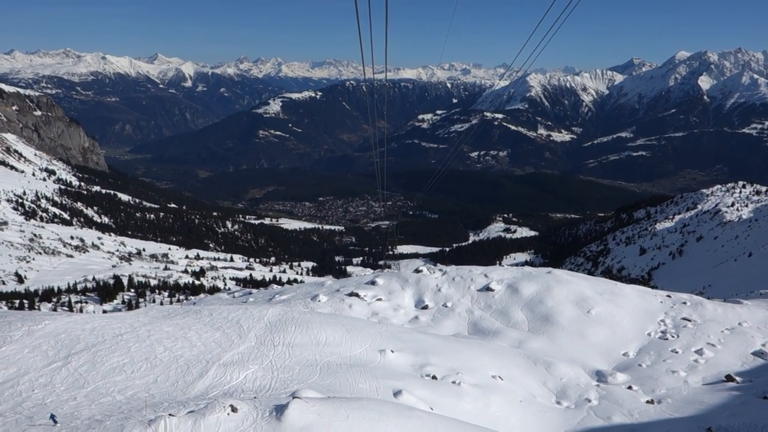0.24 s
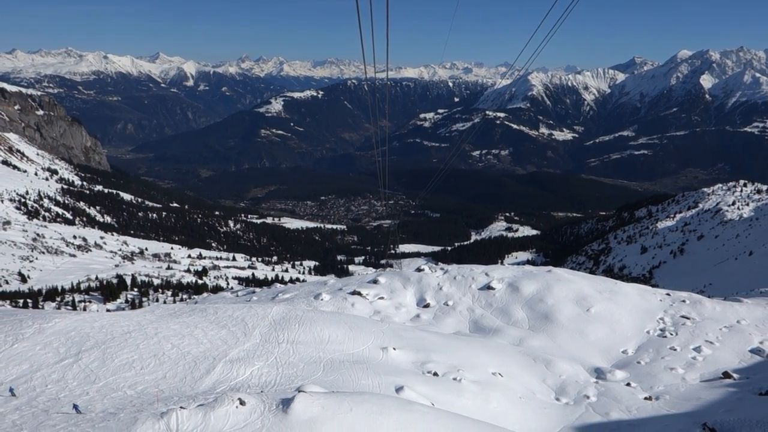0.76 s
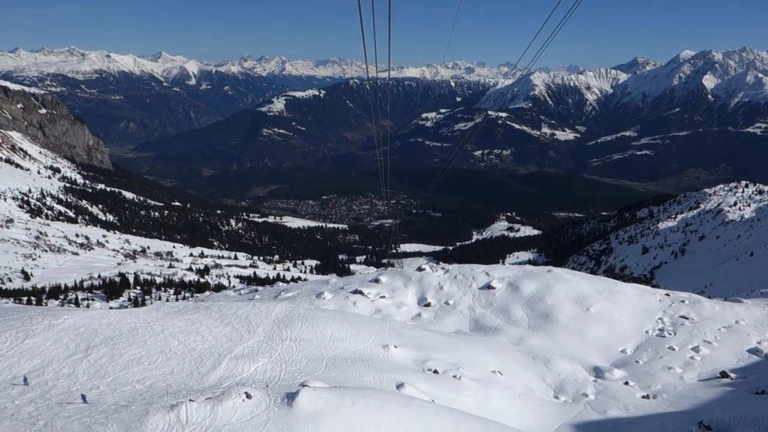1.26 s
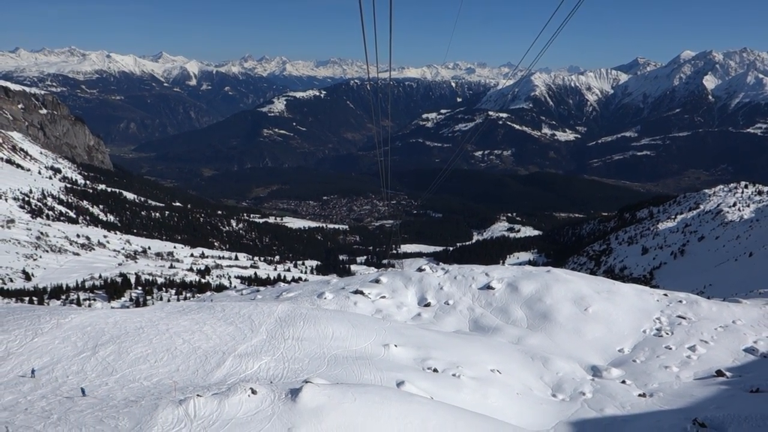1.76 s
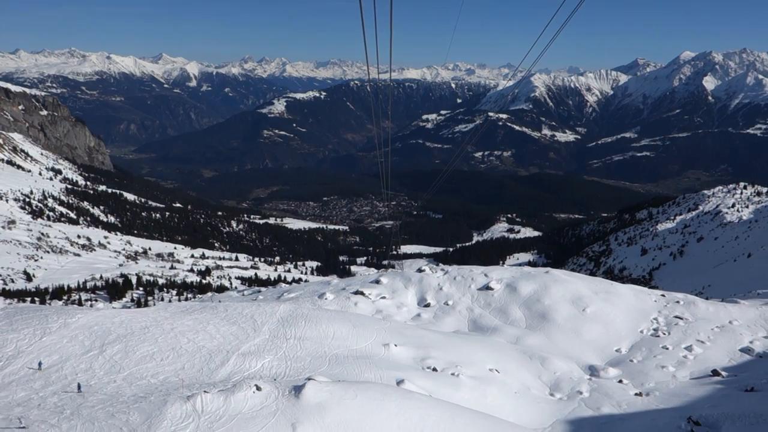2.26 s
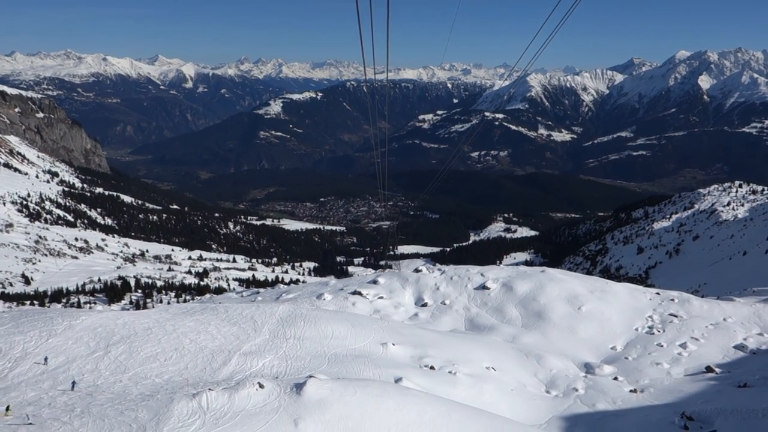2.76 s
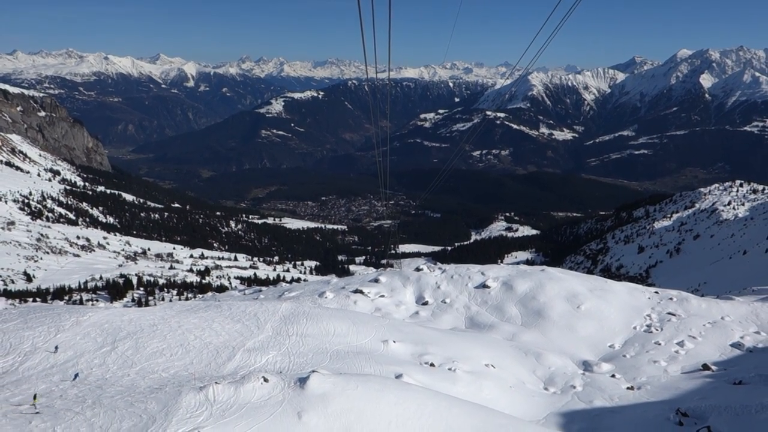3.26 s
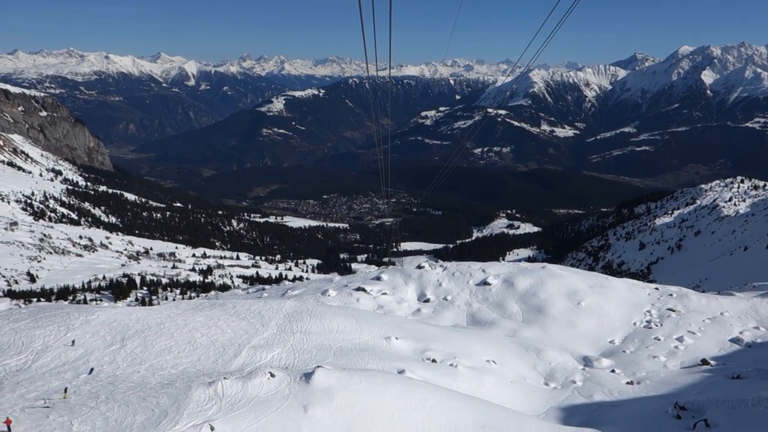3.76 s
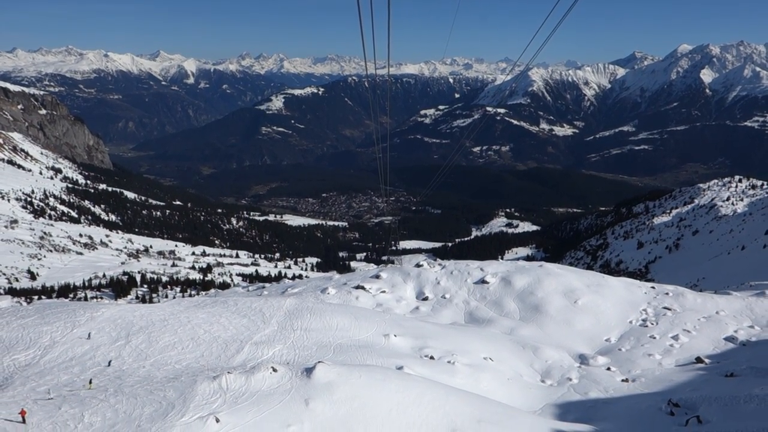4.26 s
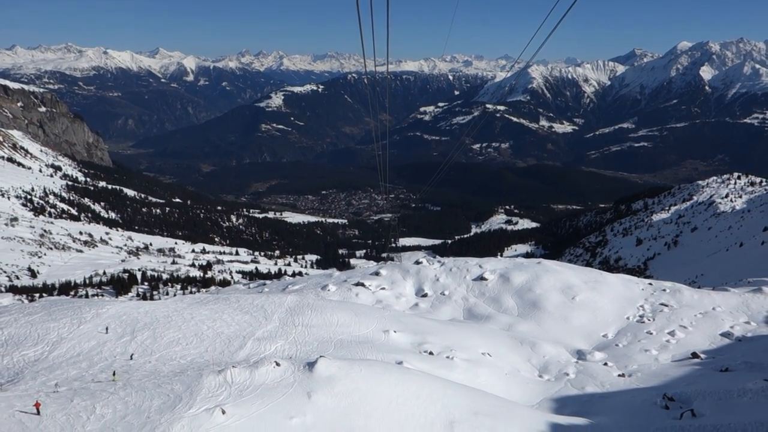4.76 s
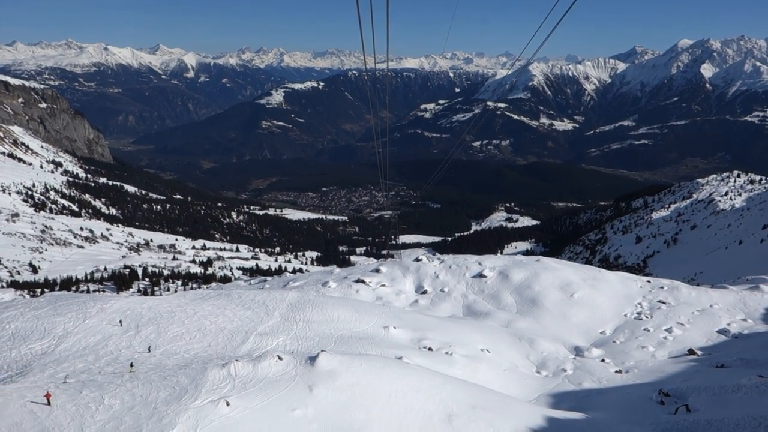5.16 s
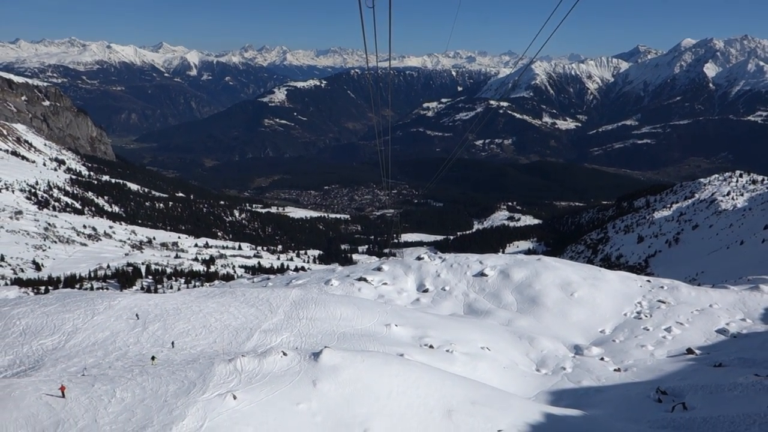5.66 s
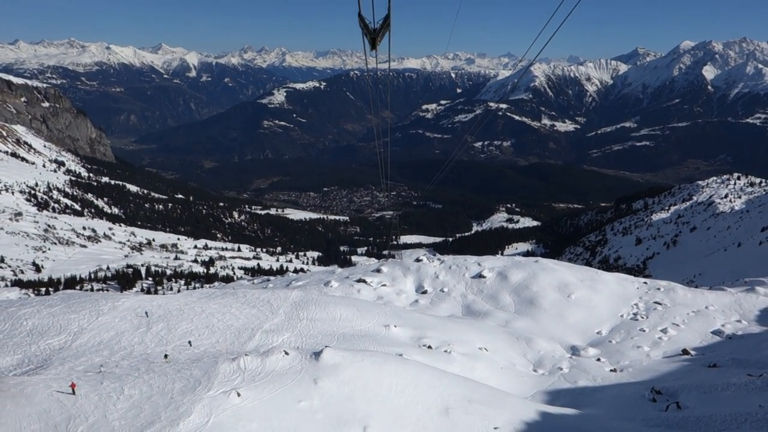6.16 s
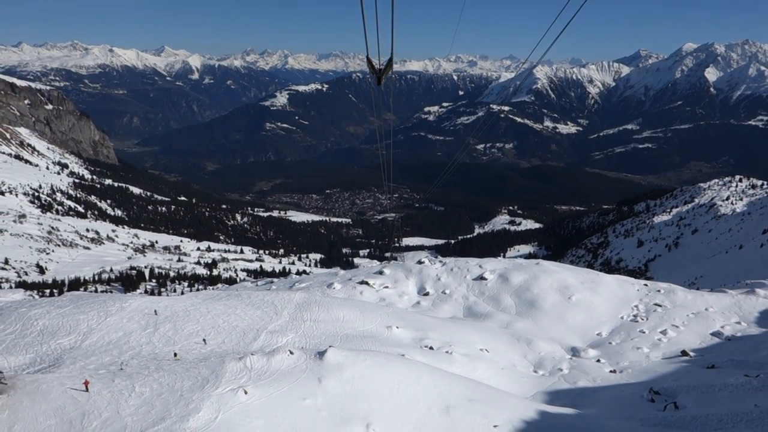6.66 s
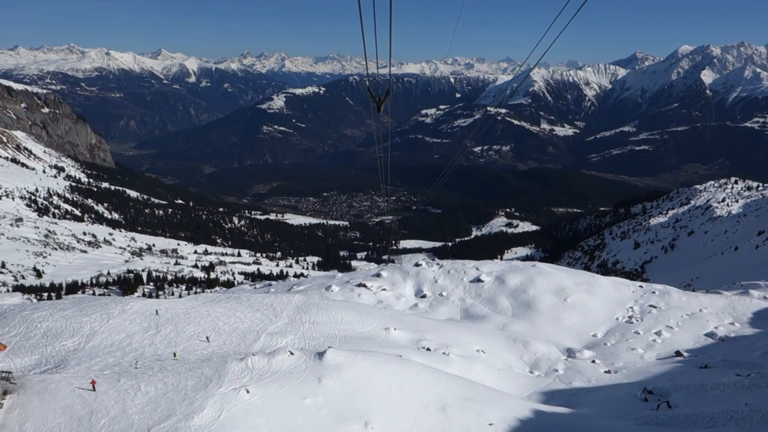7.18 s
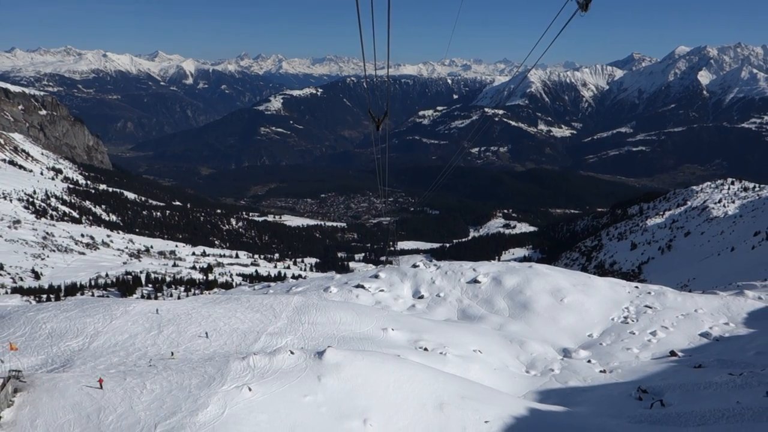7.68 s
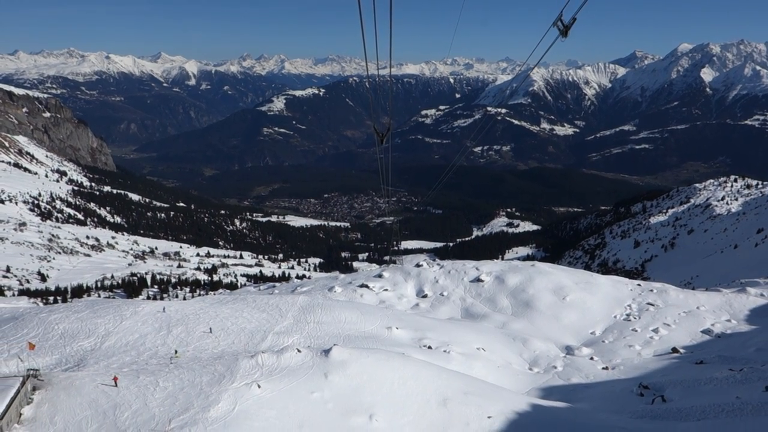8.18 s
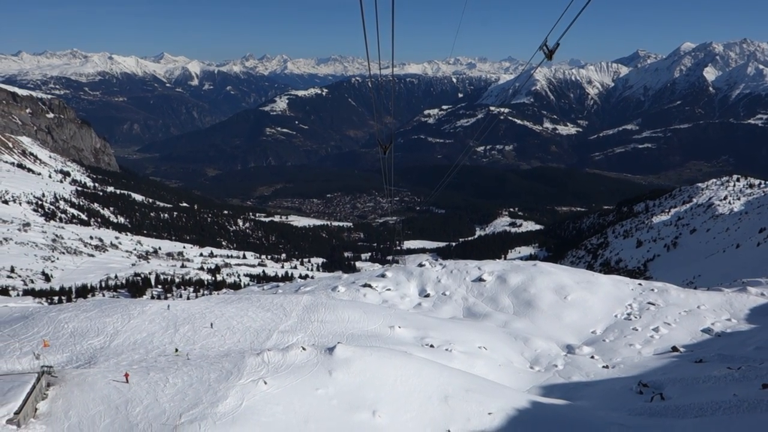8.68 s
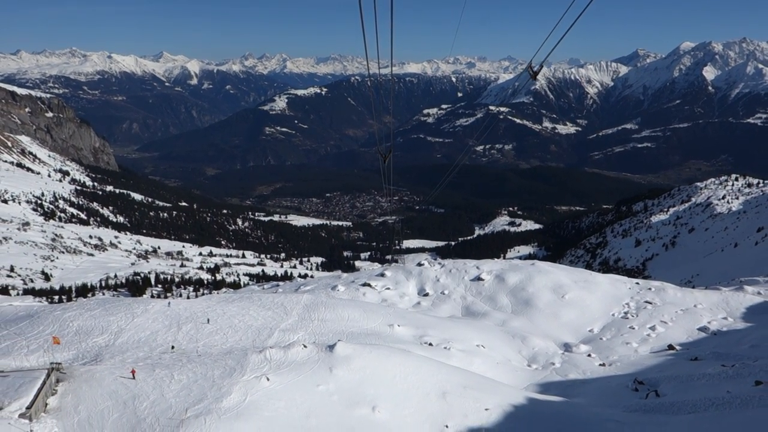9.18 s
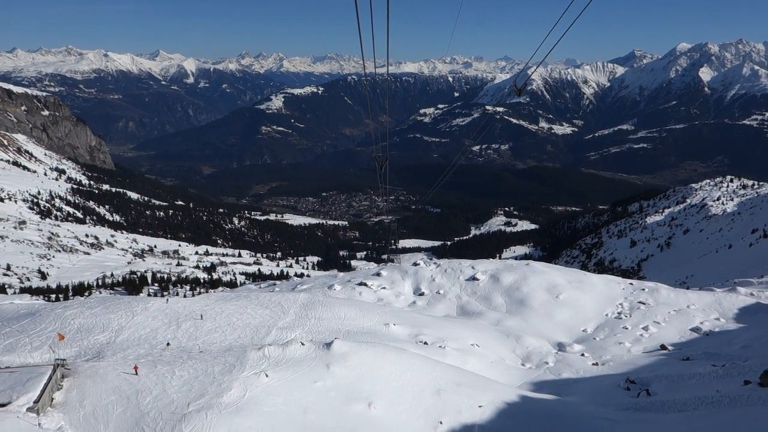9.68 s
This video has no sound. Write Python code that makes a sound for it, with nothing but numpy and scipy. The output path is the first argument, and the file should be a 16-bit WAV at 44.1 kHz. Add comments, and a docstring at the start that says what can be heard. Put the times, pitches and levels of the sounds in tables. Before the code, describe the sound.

Inside a cable-car cabin gliding along its ropes, the rollers make a steady low rumble and a wavering drone. Air rushes softly through a gap on the left, with faint hiss and metallic singing from the running gear. Halfway through, a rope vibration swells into a throbbing hum. The wall gives dull thumps, mostly in the second half, and the fittings tick faintly.

```python
"""A cable-car cabin gliding along its ropes, heard from inside. The rollers shake it, so it rumbles
and drones in a cluster of beating tones. Halfway through, a rope vibration swells into a throbbing hum.
The wall gives dull thumps, mostly in the second half, and the fittings tick. Air rushes past a gap on
the left, which also lets in the hiss and faint metallic singing of the running gear."""
import sys
import numpy as np
from scipy import signal
from scipy.fft import rfft, irfft, next_fast_len
from scipy.io import wavfile
from scipy.ndimage import uniform_filter1d, minimum_filter1d, map_coordinates

SR = 44100
rng = np.random.default_rng(int(sys.argv[2]) if len(sys.argv) > 2 else 0)


def waveform_to_disk(signal):
    """Save audio, clipped to [-1, 1], as 16-bit WAV at the path in sys.argv[1]."""
    frames = np.transpose(np.atleast_2d(signal))
    scaled = np.clip(frames, -1, 1) * 32767
    samples = np.round(scaled).astype(np.int16)
    wavfile.write(sys.argv[1], SR, samples)


N = 437913

# Gear scraping the rope. Each row: peak time in seconds, length in seconds, singing in dB, hiss in dB.
SCRAPES = [(2.166, .14, -56.5, -61.5), (2.5, 0.15, -57.5, -62.5), (2.745, .12, -50, -67.5),
           (2.872, 0.15, -54, -61.5), (3.35, 0.14, -50.5, -63.5), (3.546, 0.21, -54, -65),
           (4.643, 0.12, -53.5, -67), (5.14, .12, -59.5, -65), (5.59, .14, -51.5, -60.5),
           (6.44, 0.11, -52.5, -64), (8.523, 0.28, -54, -64), (8.976, .16, -57.5, -65)]


def cabin():
    """The rollers shake frame and panels over a broad rumble; a diffuse part differs between sides."""
    # Shaking. Each row: time in seconds, rumble and drone in relative dB.
    ride = [(0.0, -40, -30), (0.3, -35.5, -34), (1.2, -40.0, -31.5), (2.1, -38, -30), (3.0, -36, -32.0),
            (3.45, -30, -30.5), (4.0, -38.5, -29), (4.5, -40, -33), (5.3, -35.0, -31), (6.25, -38.5, -33.5),
            (6.85, -31.5, -30.5), (7.7, -38.5, -31.5), (8.4, -31.5, -31), (8.95, -42.5, -29.5),
            (9.4, -34.5, -35), (9.93, -39, -33.5)]
    # Resonances. Each row: frequency in Hz, half-width in Hz, relative level in dB.
    frame_modes = [(27.5, 4, -9), (35.8, 6, -2), (51.3, 3.6, -5.5), (62.2, 4.9, 0), (70, 5.7, -2),
                   (89.8, 2.7, -1)]
    panel_modes = [(123, 28, -7), (136.1, 20, 2.5), (162, 3.2, 3.5), (165.6, 28, 1)]
    # Noise spectra. Each row: frequency in Hz, relative density in dB.
    rumble_spectrum = [(8, -21), (20, -10.5), (45, -5.5), (110, -4.5), (200, 6.5), (270, -4.5), (350, -4),
                       (430, -22), (550, -31), (750, -39), (1200, -51), (2500, -55.5), (5000, -89.5)]
    diffuse_spectrum = [(20, -16), (45, -7), (70, -4.5), (170, 0), (260, -12.5), (500, -28), (1500, -72.5)]
    rumble_db, drone_db = curves(ride)
    frame = amp(rumble_db - 1.3) * shaken(frame_modes)
    panels = amp(drone_db - 0.5) * roller_drone() + amp(drone_db - 3.5) * shaken(panel_modes)
    broad = amp(-41.5 + 0.21 * (rumble_db - rumble_db.mean())) * noise(rumble_spectrum)
    diffuse = amp(rumble_db - 11) * noise(diffuse_spectrum, channels=2)
    return frame + placed(panels, pan_db=1.5) + broad + diffuse


def roller_drone():
    """Each tone of the turning rollers wavers on its own; together they beat. Rms 1."""
    # Each row: frequency in Hz, relative level in dB.
    roller_tones = [(97.3, -7), (126, -13.5), (128.5, -8), (140.3, -2), (148.5, 0.5), (155.8, -1.5),
                    (160.6, 2), (167, -3.5), (179.3, -2.5), (186, -5), (192.8, -1.5), (225.3, -12)]
    t = np.arange(N) / SR
    drone = np.zeros(N)
    for hz, db in roller_tones:
        gain = amp(db + 2 * wobble(1.546))
        drift_rad = 0.84 * wobble(1.268) + rng.uniform(0, 2 * np.pi)
        drone += gain * np.sin(2 * np.pi * hz * t + drift_rad)
    return unit(drone)


def rope_hum(start_s=5.3, attack_s=0.31, start_hz=181.2, rise_hz_per_s=0.44):
    """One rope vibration sets in, creeps up in pitch and throbs unevenly."""
    # Each row: time in seconds, relative level in dB.
    hum_levels = [(5.3, -41), (5.9, -31.5), (6.4, -29), (6.6, -24), (6.85, -29), (7.3, -24), (8.1, -25.5),
                  (8.45, -21), (9.0, -24.5), (9.5, -26.0), (9.93, -21)]
    throb_db, throb_per_s, left_lag_rad = 1.46, 10, 0.12
    level_db, = curves(hum_levels)
    age_s = np.arange(N) / SR - start_s
    onset = np.clip(age_s / attack_s, 0, 1)
    phase = 2 * np.pi * np.cumsum(start_hz + rise_hz_per_s * age_s) / SR + 0.051 * wobble(42)
    tone = np.sin([phase - left_lag_rad, phase])
    gain = onset * amp(level_db + 3 + throb_db * wobble(throb_per_s))
    return placed(gain * tone, pan_db=3)


def wall_thumps():
    """Soft blows ring the cabin wall; the longer the contact, the duller the thump."""
    # Each row: start in seconds, peak in dB, contact time in seconds, left over right in dB.
    blows = [(0.256, -16, 0.0037, -2.5), (3.218, -17.5, 0.0007, 9), (3.237, -16.5, .001, -13),
             (6.673, -19.5, 0.001, 6), (6.718, -11.5, 0.0014, 7), (6.91, -18, 0.003, -6),
             (6.995, -16.5, 0.0016, -14.5), (7.222, -15, 0.00071, 7.5), (7.271, -16, 0.0007, 4.5),
             (8.0, -17, 0.0025, 4.5), (8.057, -8.5, 0.00034, 6), (8.061, -11.5, 0.00046, 4),
             (8.1, -14, 0.003, 1), (8.345, -20, .0013, 4.5), (8.368, -14.5, 0.0014, -5),
             (8.408, -14.5, 0.0014, 0.5), (8.432, -9.5, .0008, 6.5), (8.491, -17, .002, 5.5),
             (9.361, -18, 0.001, 8.5), (9.416, -13.5, .0009, 6.5)]
    # Each row: frequency in Hz, relative level in dB, 60 dB decay time in seconds.
    wall_modes = [(78, -12.5, 0.12), (113.5, -4.5, 0.6), (225, -4, 0.063), (263.8, 8, 0.08),
                  (358, 2.5, 0.059), (452, -2.5, 0.069), (640, -5, 0.034), (900, -12, 0.0095)]
    out, t = np.zeros((2, N)), np.arange(SR // 5) / SR
    hz, mode_db, t60_s = np.transpose(wall_modes)[:, :, None]
    for start_s, peak_db, contact_s, pan_db in blows:
        strength, detune, skew = rng.standard_normal((3, len(wall_modes), 1))
        phase = 2 * np.pi * hz * (1 + 0.06 * detune) * t
        decay = amp(mode_db + 2 * strength - 60 * t / t60_s)
        # each mode reaches the two sides slightly out of step
        ring = np.array([(decay * np.sin(phase + side * 0.11 * skew)).sum(0) for side in (1, -1)])
        force = t * np.exp(-2 * t / contact_s)
        thump = signal.fftconvolve(ring, [force], axes=1)[:, :len(t)]
        add(out, start_s, placed(amp(peak_db) * thump / abs(thump).max(), pan_db))
    return out


def gap(scatter_share=0.31):
    """Air and gear noise enter on the left and reach the right shaded and partly scattered."""
    # Steady flow. Each row: time in seconds, air rush and hiss in relative dB.
    flow = [(0.0, -58, -61.5), (0.55, -58, -62.5), (0.9, -59.5, -64), (1.1, -58, -60), (1.65, -56, -60),
            (2.0, -58.5, -64), (2.2, -55.5, -62), (2.9, -57.0, -61), (3.6, -57.5, -65), (4.0, -57.5, -67),
            (5.3, -56, -67), (5.7, -56, -65.5), (7.2, -55.5, -64), (8.1, -56, -66.0), (8.6, -55.5, -66.5),
            (9.3, -56, -67.5), (9.93, -57.5, -68.5)]
    # Each row: frequency in Hz, left over right in dB.
    shade = [(220, 2.5), (330, 17.5), (450, 15.5), (700, 19), (2000, 19.5), (4000, 19), (12000, 7.5)]
    # Each row: frequency in Hz, left minus right phase in radians.
    lead = [(430, 0), (860, -1.7), (1200, -2), (12000, -2.5)]
    rush_db, hiss_db = curves(flow)
    direct, scattered = air_rush(rush_db) + gear_singing(hiss_db) + gear_hiss(hiss_db)
    blend = np.sqrt(1 - scatter_share) * direct + np.sqrt(scatter_share) * scattered
    right = filtered(blend, lambda hz: amp(-along(shade, hz)) * np.exp(-1j * along(lead, hz)))
    return np.array([direct, right])


def air_rush(level_db):
    """Air flows past the gap with a slight flutter."""
    # Each row: frequency in Hz, relative density in dB.
    rush_spectrum = [(120, -14.5), (260, 14.5), (400, 17.5), (500, 14.5), (650, 7.5), (820, -0.5),
                     (1100, 0), (1450, -3), (1900, -5), (2350, -9.5), (2750, -21), (5000, -44.5),
                     (9000, -72.5)]
    return amp(level_db + 15 + 0.92 * wobble(15)) * noise(rush_spectrum, channels=2)


def gear_singing(hiss_db, scrape_low_hz=1000):
    """The running gear rings in step with the steady hiss; scrapes excite only its upper modes."""
    # Each row: frequency in Hz, half-width in Hz, relative level in dB.
    gear_modes = [(666, 24, 12.5), (888, 22, -1), (1590, 34, 3), (1768, 30, 2.5), (1850, 490, -6.5),
                  (2360, 28, -5), (2542, 22, -4.5), (3420, 50, -19.5), (4370, 40, -14.5)]
    steady = amp(hiss_db + 6 + wobble(9)) * shaken(gear_modes, channels=2)
    upper_modes = [mode for mode in gear_modes if mode[0] > scrape_low_hz]
    scrape_gain = sum(amp(db) * swell(peak_s, length_s) for peak_s, length_s, db, _ in SCRAPES)
    return steady + scrape_gain * shaken(upper_modes, channels=2)


def gear_hiss(level_db):
    """The hiss at the gap flares whenever the gear scrapes the rope."""
    # Each row: frequency in Hz, relative density in dB.
    hiss_spectrum = [(1000, -21.5), (2200, 3.5), (3000, -0.5), (3700, 1.5), (4200, -3.5), (4550, -1),
                     (5100, -7), (6500, -3.5), (8000, -10), (11000, -11), (16000, -18)]
    gain = amp(level_db + 0.74)
    for peak_s, length_s, _, db in SCRAPES:
        gain = np.hypot(gain, amp(db) * swell(peak_s, length_s))
    return gain * amp(0.63 * wobble(12)) * noise(hiss_spectrum, channels=2)


def fitting_ticks():
    """Fittings click, rustle and squeak, each in its own noise band."""
    # Each row: start in seconds, level in dB, centre and width in Hz,
    # rise and 60 dB decay times in seconds, left over right in dB.
    ticks = [(0.154, -51, 3530, 2000, .0005, 0.025, 11), (4.35, -61, 7900, 900, 0.022, 0.52, 11),
             (4.61, -63, 4350, 90, .04, 0.38, 12), (5.739, -49, 1782, 40, 0.05, 0.43, 13),
             (6.29, -63, 6400, 1200, 0.033, .5, 3), (6.401, -50, 1777, 40.5, .08, 0.55, 18),
             (6.569, -40, 12600, 7940, 0.0003, .012, 5), (6.622, -64, 11100, 4030, 0.00092, 0.034, -1),
             (8.46, -52, 1200, 895, .06, .9, 14.5), (8.53, -49.5, 892, 36, 0.019, 0.6, 12),
             (8.57, -65, 11080, 5990, 0.027, .4, 4.5)]
    out, t = np.zeros((2, N)), np.arange(SR // 2) / SR
    for start_s, db, centre_hz, width_hz, rise_s, t60_s, pan_db in ticks:
        white = rng.standard_normal((2, len(t)))
        band = unit(filtered(white, lambda hz: 1 / (1 + (2 * (hz - centre_hz) / width_hz) ** 2)))
        envelope = amp(db - 60 * t / t60_s) * (1 - np.exp(-(t / rise_s) ** 2))
        add(out, start_s, placed(envelope * band, pan_db))
    return out


def noise_floor(whine_hz=15625):
    """Steady electronic hiss and a thin whine."""
    # Each row: frequency in Hz, relative density in dB.
    floor_spectrum = [(100, 9.5), (1700, 2.5), (2600, 1), (3800, 1), (4800, -1), (5600, 1.5), (7000, 0),
                      (10000, -1), (15500, -4.5)]
    whine = amp(-88.5) * np.sin(2 * np.pi * whine_hz * np.arange(N) / SR)
    return amp(-65) * noise(floor_spectrum, channels=2) + whine


def amp(db):
    """Decibels to gain."""
    return 10 ** (np.asarray(db) / 20)


def unit(x):
    """Scale to rms 1."""
    return x / np.sqrt(np.mean(x ** 2) + 1e-20)


def along(points, hz):
    """Interpolate (Hz, value) points on a log frequency axis."""
    knots_hz, values = np.transpose(points)
    return np.interp(np.log(hz + 1), np.log(knots_hz + 1), values)


def curves(rows):
    """One value per sample for each column after the time."""
    times_s, *columns = np.transpose(rows)
    return [np.interp(np.arange(N) / SR, times_s, column) for column in columns]


def wobble(knots_per_s):
    """Smooth random curve, rms near 1."""
    position = np.arange(N) * knots_per_s / SR
    knots = rng.standard_normal(int(position[-1]) + 4)
    coarse = np.linspace(0, position[-1], num=2000)
    return np.interp(position, coarse, map_coordinates(knots, [coarse]))


def swell(peak_s, length_s):
    """Gaussian rise and fall, peak 1."""
    return np.exp(-(2 * (np.arange(N) / SR - peak_s) / length_s) ** 2)


def filtered(x, response):
    """Apply a response given as a function of Hz."""
    size = next_fast_len(x.shape[-1] + SR // 2)
    spectrum = rfft(x, size) * response(np.fft.rfftfreq(size, 1 / SR))
    return irfft(spectrum, size)[..., :x.shape[-1]]


def noise(spectrum, channels=1):
    """Independent noises with the given spectrum, rms 1."""
    return unit(filtered(rng.standard_normal((channels, N)), lambda hz: amp(along(spectrum, hz))))


def shaken(modes, channels=1):
    """Steep-skirted resonances under random shaking, rms 1."""
    def response(hz):
        return np.sqrt(sum(amp(db) ** 2 / (1 + ((hz - mode_hz) / half_width_hz) ** 2) ** 2
                           for mode_hz, half_width_hz, db in modes))
    return unit(filtered(rng.standard_normal((channels, N)), response))


def placed(x, pan_db):
    """Pan left over right by pan_db; the two gains average 1."""
    gains = amp([[pan_db / 2], [-pan_db / 2]])
    return x * gains / gains.mean()


def add(track, start_s, sound):
    """Mix a stereo sound in at start_s."""
    part = track[:, max(round(start_s * SR), 0):][:, :sound.shape[1]]
    part += sound[:, :part.shape[1]]


def limited(x, ceiling_db, hold_s):
    """The gain ducks briefly whenever a peak would pass the ceiling."""
    size = int(hold_s * SR) | 1
    needed = np.minimum(1, amp(ceiling_db) / (abs(x).max(0) + 1e-9))
    held = minimum_filter1d(needed, size, origin=size // 2)
    return x * uniform_filter1d(minimum_filter1d(held, size=101), size=101)


def scene():
    """Stereo sum of all sources in the cabin."""
    return cabin() + rope_hum() + gap() + wall_thumps() + fitting_ticks() + noise_floor()


def record(dry, low_cut_hz=12, top_hz=15750):
    """Cut the deepest bass, limit peaks, fade the ends and remove the top treble."""
    thinned = filtered(dry, lambda hz: hz ** 2 / (hz ** 2 + low_cut_hz ** 2))
    held = limited(thinned, ceiling_db=-9.5, hold_s=0.03)
    fade = signal.windows.tukey(N, 0.001)
    return filtered(fade * held, lambda hz: hz < top_hz)


dry = scene()
out = record(dry)
waveform_to_disk(out)
```